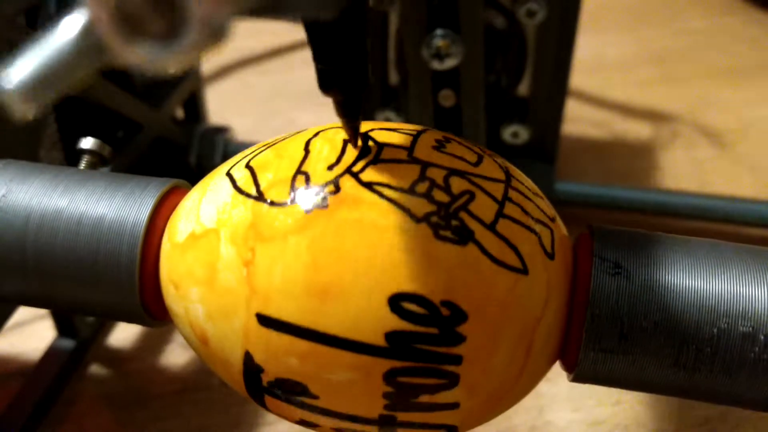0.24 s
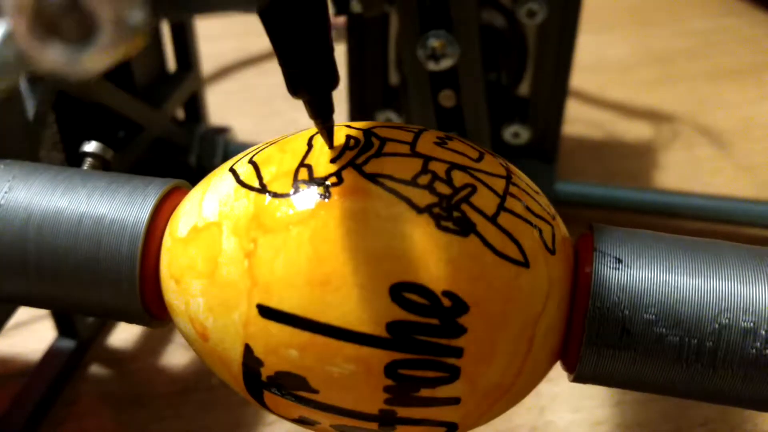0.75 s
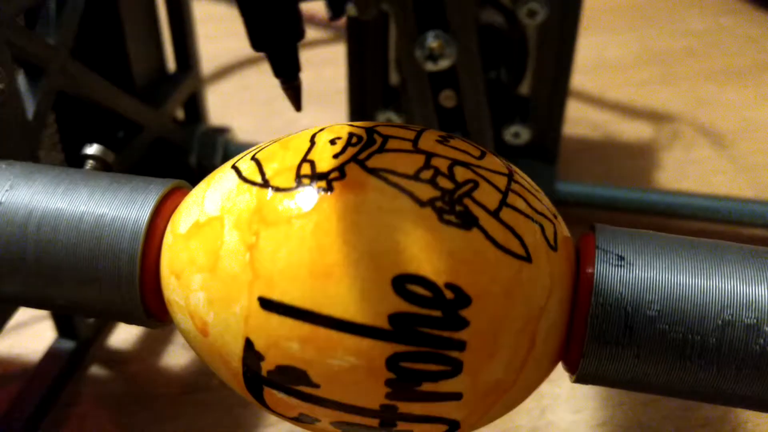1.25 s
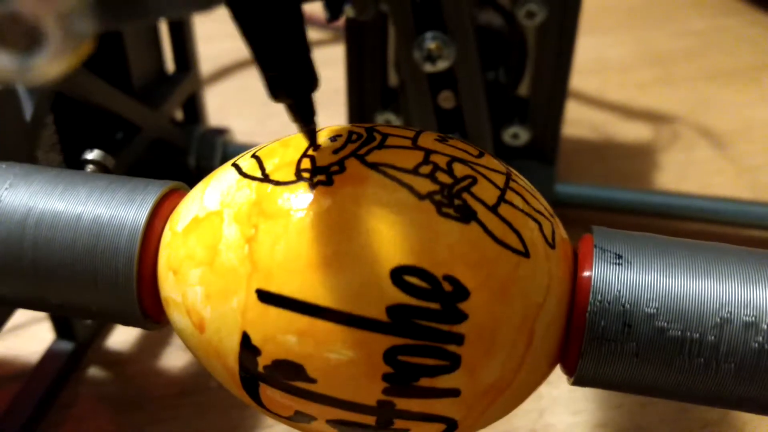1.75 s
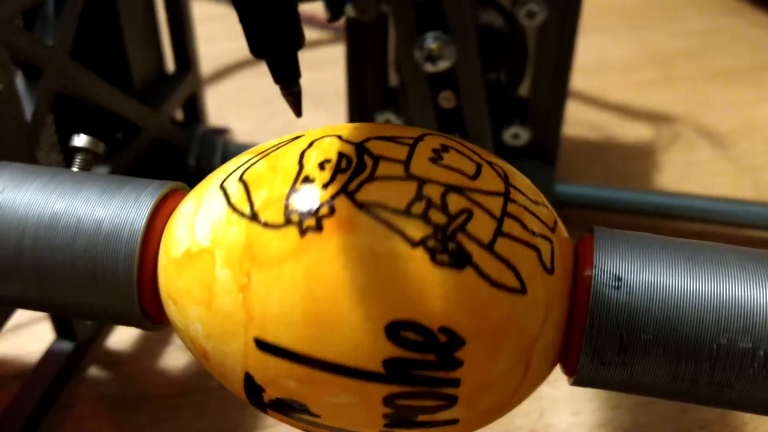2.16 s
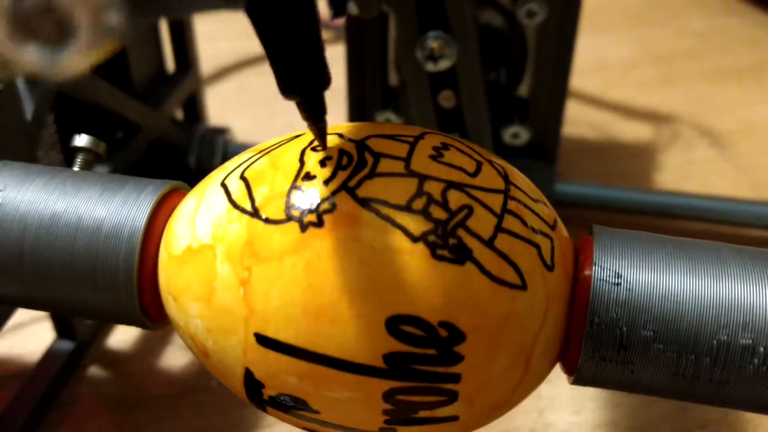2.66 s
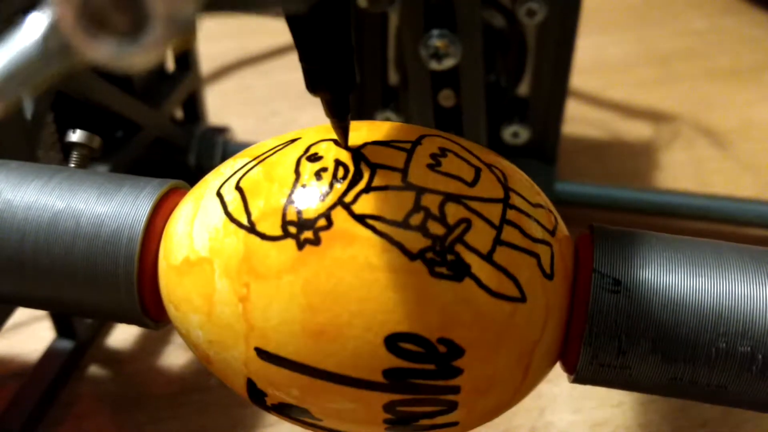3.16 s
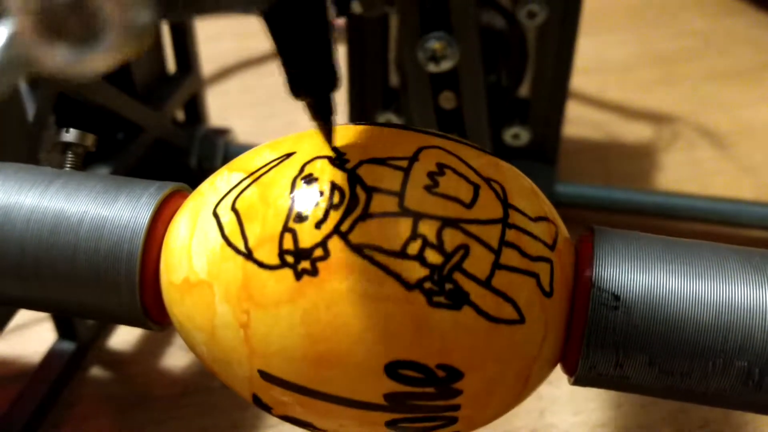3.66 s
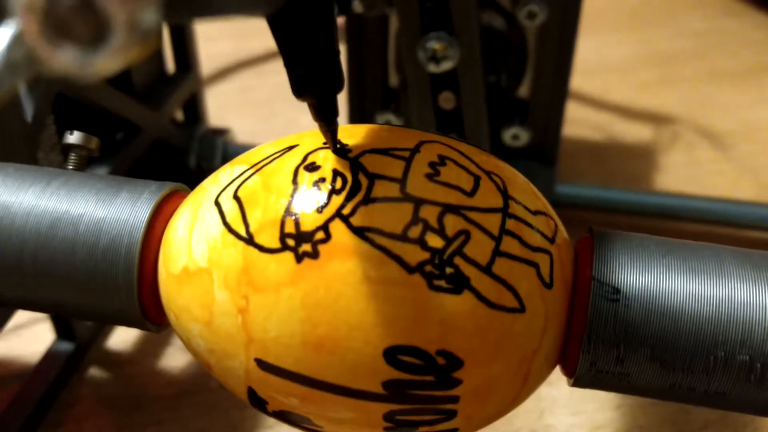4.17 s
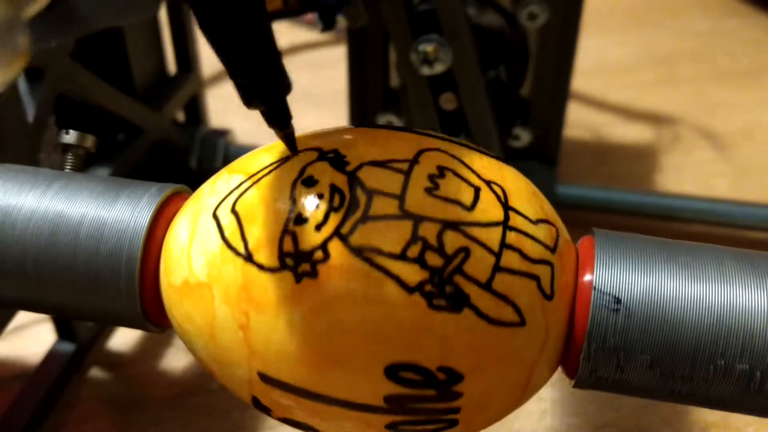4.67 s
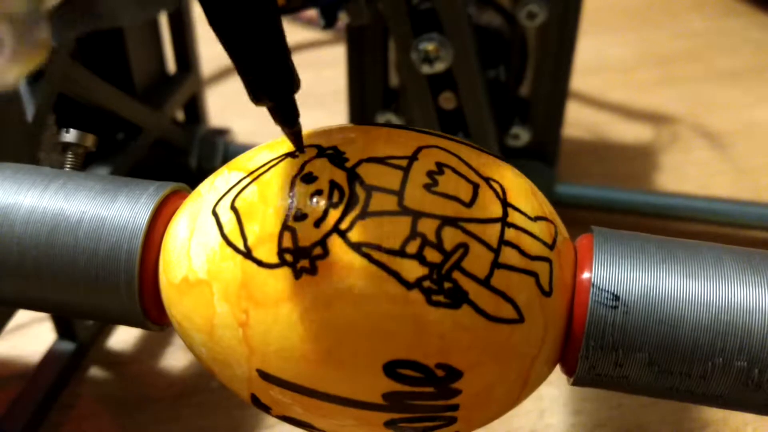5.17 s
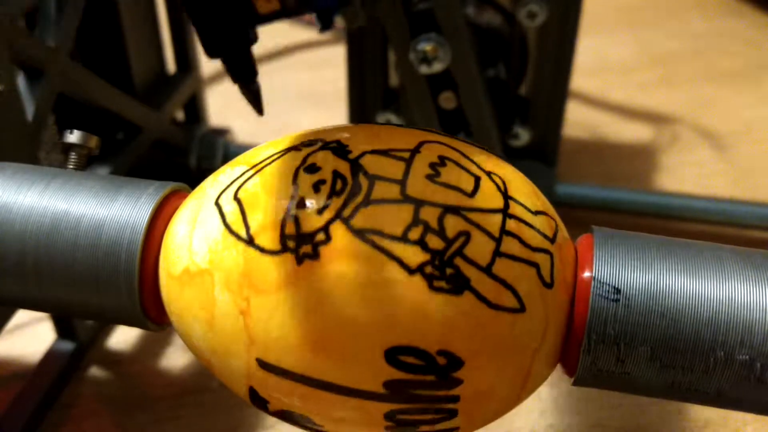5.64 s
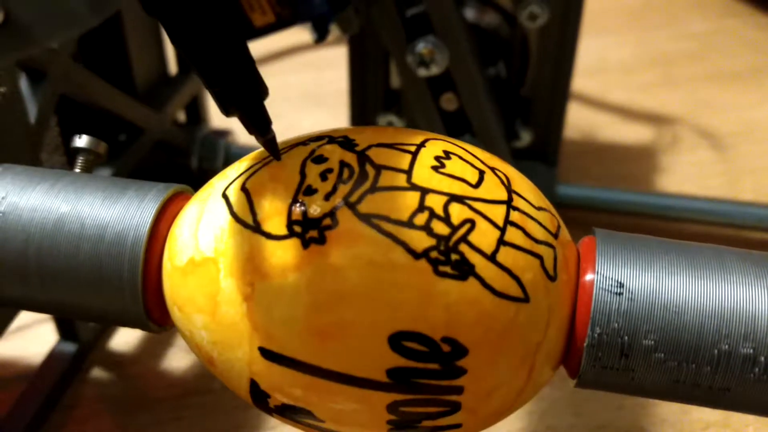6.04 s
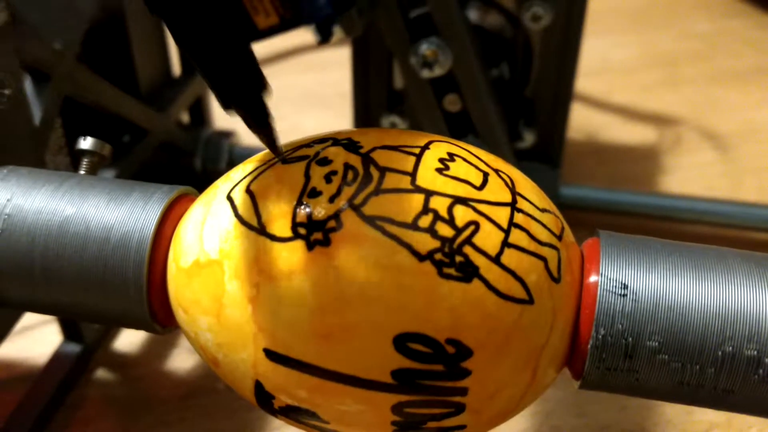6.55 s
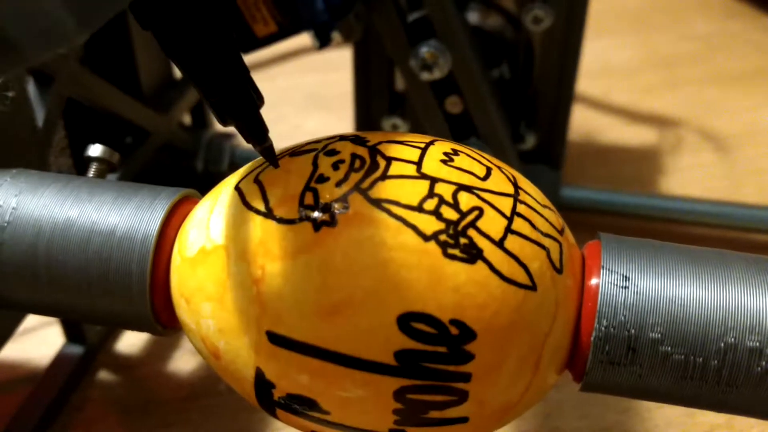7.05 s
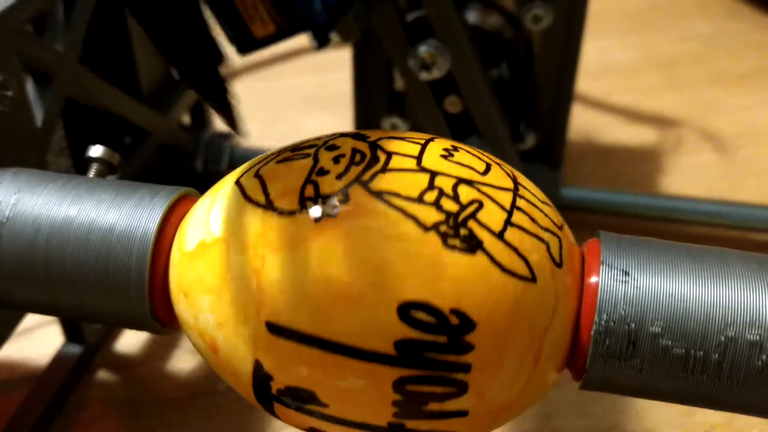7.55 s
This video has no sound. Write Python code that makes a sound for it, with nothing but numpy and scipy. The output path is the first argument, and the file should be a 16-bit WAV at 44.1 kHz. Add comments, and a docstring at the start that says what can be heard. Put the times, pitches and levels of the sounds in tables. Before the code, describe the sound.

A small plotter draws on an egg, heard close up on a wooden table in a quiet room. Its motors make a faint, high whine that throbs over a soft rumble and hiss as they move, and holds steady when they pause. A short, bright gear rasp lifts the pen; another lowers it into a hollow, rattling knock that leaves the table humming. This cycle repeats nine times, with tiny ticks and soft bumps between.

```python
"""Indoors, on a wooden table in a small quiet room, a little plotter draws on an egg.
Two stepper motors turn the egg and swing the pen arm: their coils whine and hiss, throbbing over a
rumble on the move, holding steady at rest. A geared servo rasps to lift and lower the pen and twitches
while it holds; the arm jolts at sharp corners. The pen lands on the shell with a hollow, rattling
knock that sets the table humming. The cycle is draw, lift, travel, drop, nine times over."""
import sys
import numpy as np
from scipy import signal
from scipy.fft import rfft, irfft, next_fast_len
from scipy.io import wavfile
from scipy.ndimage import uniform_filter1d

SR = 44100
rng = np.random.default_rng(int(sys.argv[2]) if len(sys.argv) > 2 else 0)


def master_out(mix):
    """Clip the mix to full scale and print it as 16-bit PCM to the path in sys.argv[1]."""
    frames = np.transpose(np.atleast_2d(mix))
    ceiling = np.clip(frames, -1, 1)
    pcm = np.round(ceiling * 32767).astype(np.int16)
    wavfile.write(sys.argv[1], SR, pcm)


N = 344421
TIME = np.arange(N) / SR

# Table levels are relative; each layer sets its own gain on top.
# low bed of the room: freq_hz, level_db
ROOM_TONE_EQ = [(25, -33), (60, -56), (125, 2), (260, 7), (400, -3.5), (600, -3), (1000, -9), (2000, -17),
                (4000, -35), (12000, -24.5), (15500, -23.5)]
# faint steady tones, from the electronics and, near 4.65 kHz, the whine's third harmonic: pitch_hz, level_db
FAINT_TONES = [(797, -70.5), (4037, -81), (4655, -79)]
# pen-down moves, one before each lift: coil_rate_hz, vigour_db, held_whine_db
DRAW_MOVES = [(32.95, 7, -53.5), (30.6, -7.5, -55.5), (19.3, 4.5, -50), (16.9, 4, -49), (17.07, -3, -52),
              (21.82, -1.5, -58), (23.4, -9, -63), (26.2, 2, -50), (30.8, 4.5, -52)]
# pen-up moves, one after each lift: coil_rate_hz, vigour_db, held_whine_db
TRAVEL_MOVES = [(18.3, -5, -49.5), (31.6, -0.5, -48.5), (53.8, -0.5, -46.5), (27.23, 0.5, -59),
                (49.5, -1, -62), (12.2, -9.5, -58), (36.9, -1.5, -51.5), (41.2, 1, -50), (45.9, -4, -49.5)]
# body of the running steppers: freq_hz, level_db
RUMBLE_EQ = [(40, -69), (90, -18), (170, 0.5), (240, 5), (320, -4.5), (560, -8), (780, -4), (1000, -14),
             (2000, -13), (4000, -49), (12000, -33)]
# hiss of their coils: freq_hz, level_db
HISS_EQ = [(1000, -11.5), (2800, -2), (4300, -1), (5500, -5), (8000, -5.5), (10000, -10.5), (15500, -42)]
# pen lifts: start_s, servo_start_db, servo_end_db
PEN_LIFTS = [(0.3712, -34, -35), (1.049, -42, -35), (1.847, -34.5, -34), (2.7496, -35.5, -33),
             (3.746, -39.5, -31), (4.7715, -36, -35), (5.445, -43.5, -32.5), (6.452, -35.5, -31.5),
             (7.3935, -33.5, -35.5)]
# pen drops: landing_s, servo_before_db, servo_after_db, knock_db
PEN_DROPS = [(0.705, -44.5, -43.5, -31), (1.4477, -43, -35.5, -28), (2.3305, -43, -37.5, -29),
             (3.1673, -43, -43.5, -30), (4.1033, -45, -40, -30.5), (5.095, -48.5, -43.5, -32),
             (5.91, -42.5, -39, -29.5), (6.8314, -41.5, -37, -28.5), (7.77, -43, -36.5, -30)]
# gear rasp going up: freq_hz, level_db
LIFT_EQ = [(300, -23), (1000, -12), (2000, -8.5), (3300, -11.5), (4400, 0.5), (5200, -6), (7200, 2),
           (8600, 5), (10200, -5.5), (11600, 1.5), (12200, -2), (12900, 0.5), (15500, -11)]
# gear rasp going down: freq_hz, level_db
DROP_EQ = [(300, -33), (1200, -5.5), (2500, -10), (3200, -11.5), (4400, -0.5), (5300, -7.5), (6600, -3),
           (8400, 1.5), (9800, -6.5), (11800, -7.5), (13000, -10), (15500, -14)]
# modes of the servo's case and gears: pitch_hz, level_db, t60_s
GEARBOX_MODES = [(1305, -6, 0.056), (2850, -52, 0.072), (4445, -13.5, 0.065), (5980, -15.5, 0.025),
                 (6150, -16.5, 0.044), (6950, -4, 0.0073), (8004, -21, 0.16), (7990, -19, 0.1),
                 (13000, -24, 0.023)]
# arm jolts at sharp corners of the line: start_s, level_db
ARM_JOLTS = [(0.52, -43.5), (1.733, -50), (3.48, -42), (4.598, -43), (4.739, -48), (6.254, -43.5),
             (6.388, -36), (7.154, -39.5), (7.348, -37)]
# modes of egg, arm and frame: pitch_hz, level_db, t60_s
FRAME_MODES = [(170.2, -7, 0.11), (222.4, -4, 0.076), (291.5, -11, 0.035), (357, -4, 0.027),
               (421, -2.5, 0.037), (606, 0.5, 0.048), (591, -8.5, 0.033), (849, -24.5, 0.097),
               (980, -10, 0.0084), (1174, -22.5, 0.15), (1376, -23.5, 0.068)]
# twitches of the holding servo: start_s, level_db
SERVO_TWITCHES = [(0.5332, -41), (0.5619, -33.5), (2.7131, -35), (3.479, -41), (3.5072, -32), (3.519, -39),
                  (3.551, -39.5), (4.4383, -45), (5.4016, -41), (5.4293, -33.5), (5.655, -39),
                  (6.3667, -36), (6.75, -41)]
# bright tick of a twitch: freq_hz, level_db
TWITCH_EQ = [(100, -26), (500, -6), (3000, -14), (4600, 5), (5700, -3), (7000, 7.5), (9000, -12),
             (12500, 0.5), (15500, -8)]
# contacts of one landing, as the tip touches and the arm rattles to rest: offset_s, thump_db, click_db
LANDING_CONTACTS = [(-.0018, -0.5, -0.5), (.002, -2.4, -8), (.0046, 4, 2.5), (.0077, -1.7, -2),
                    (0.0132, -4.5, -1)]
# click of the linkage: freq_hz, level_db
CLICK_EQ = [(60, -38), (300, -13), (1300, 9.5), (1900, 6.5), (3200, -1.5), (4600, 5), (7000, 4),
            (10000, -4.5), (11800, 0), (13500, -16), (15500, 1)]
# reverb decay by band: freq_hz, t60_s
ROOM_DECAY = [(100, 0.57), (500, 0.39), (2000, 0.18), (7000, 0.35), (14000, 0.063)]
# how far the left microphone port trails the right: freq_hz, lag_rad
LEFT_LAG = [(0, 0), (130, .7), (1000, .6), (1480, 2.6), (1620, 2.65), (1780, 3.2), (8880, 28.3),
            (11500, 37.2), (12400, 37.4), (13500, 35.6)]


def from_db(db):
    """Decibels to gain."""
    return 10 ** (np.asarray(db) / 20)


def at_hz(points, hz):
    """Read a curve on a log-frequency axis."""
    freqs, values = np.transpose(points)
    return np.interp(np.log(np.maximum(hz, 1)), np.log(freqs), values)


def drift(rate_hz):
    """Random modulator with a spread of 1, gliding to rate_hz new values a second."""
    knots = rng.standard_normal(8192)
    return np.interp(TIME * rate_hz, np.arange(len(knots)), knots) * np.sqrt(3 / 2)


def eq(x, curve):
    """Minimum-phase EQ: no pre-ring, and white noise keeps its power."""
    size = 8192
    gain = from_db(at_hz(curve, np.fft.rfftfreq(size, 1 / SR)))
    cepstrum = irfft(np.log(gain / np.sqrt(np.mean(gain ** 2))))
    cepstrum[1:size // 2] *= 2
    cepstrum[size // 2 + 1:] = 0
    return signal.oaconvolve(x, irfft(np.exp(rfft(cepstrum))))[:N]


def butter(x, kind, hz, order):
    """Plain low-pass or high-pass."""
    return signal.sosfilt(signal.butter(order, hz, kind, fs=SR, output="sos"), x)


def impulses(times_s, levels_db):
    """One single-sample click for each event."""
    out = np.zeros(N)
    samples = np.round(times_s * SR).astype(int)
    np.add.at(out, np.clip(samples, 0, N - 1), from_db(levels_db))
    return out


def ring(drive, hz, t60_s):
    """One resonance: a unit click starts a decaying sine of height 1."""
    decay, angle = from_db(-60 / (t60_s * SR)), 2 * np.pi * hz / SR
    return signal.lfilter([0, np.sin(angle)], [1, -2 * decay * np.cos(angle), decay ** 2], drive + 1e-18)


def crackle(clicks, rise_s):
    """Each click becomes a tiny noise burst that peaks after rise_s and dies away."""
    age = np.arange(SR // 20) / SR / rise_s
    envelope = signal.oaconvolve(clicks, age * np.exp(1 - age))[:N]
    return envelope * rng.standard_normal(N)


def stereo_ports(x):
    """Mono to stereo: sound reaches the left port later than the right."""
    size = next_fast_len(N + SR // 10)
    lag = np.interp(np.fft.rfftfreq(size, 1 / SR), *np.transpose(LEFT_LAG))
    left = irfft(rfft(x, size) * np.exp(-1j * lag), size)[:N]
    return np.array([left, x])


def room_tone():
    """A soft, low bed of noise, partly shared by the two sides."""
    left, right, shared = [eq(rng.standard_normal(N), ROOM_TONE_EQ) for _ in range(3)]
    return from_db(-63) * np.array([left, right]) + from_db(-60) * stereo_ports(shared)


def faint_tones():
    """Faint tones, steady in pitch and wavering a little in level."""
    return sum(np.sqrt(2) * from_db(db + 2 * drift(17)) * np.sin(2 * np.pi * hz * TIME)
               for hz, db in FAINT_TONES)


def stepper_controls(before_lift_s, after_lift_s, before_landing_s, after_landing_s):
    """Control curves for the steppers, which move between servo strokes and wait around each one."""
    moves, ready = [], 0
    for (lift, *_), (landing, *_), draw, travel in zip(PEN_LIFTS, PEN_DROPS, DRAW_MOVES, TRAVEL_MOVES):
        moves.append((ready, lift - before_lift_s, *draw))
        moves.append((lift + after_lift_s, landing - before_landing_s, *travel))
        ready = landing + after_landing_s
    rate_hz, motion, current, vigour_db = np.zeros((4, N))
    for start, end, move_hz, move_db, held_db in moves:
        during = (TIME >= start) & (TIME < end)
        rate_hz[during], motion[during], vigour_db[during] = move_hz, from_db(move_db), move_db
        current[during] = from_db(-53 + 0.5 * move_db)
        current[TIME >= end] = from_db(held_db - 2.5)  # holding current where the rotors stop
    return uniform_filter1d([rate_hz, motion, current, vigour_db], size=700)  # 16 ms ramps


def stepper_whine(rate_hz, current, pitch_hz, throb_per_hz):
    """Coil currents swell and reverse as the rotors turn: the whine throbs in motion, steady at rest."""
    egg_phase = 2 * np.pi * np.cumsum(rate_hz * (1 + 0.48 * drift(12))) / SR
    arm_phase = 2 * np.pi * np.cumsum(rate_hz * (0.22 + 0.303 * drift(11))) / SR
    depth = throb_per_hz * rate_hz * from_db(10 * drift(40))  # uneven steps make the throb stutter
    throb = (1 + depth * (np.cos(egg_phase) + 0.5j * np.cos(arm_phase))) / np.sqrt(1 + depth ** 2 / 2)
    waver = np.exp(1j * 0.023 * rate_hz * drift(70))  # the pitch wavers while the rotors turn
    carrier = np.exp(2j * np.pi * pitch_hz * TIME)
    return np.sqrt(2) * current * np.real(throb * waver * carrier)


def stepper_noise(motion, vigour_db, rumble_db, hiss_db):
    """Turning motors add a lumpy rumble; the coils hiss throughout. Both follow a move's vigour."""
    lumpy = rng.standard_normal(N) * motion * from_db(rumble_db + 2.5 * drift(90))
    hiss = eq(rng.standard_normal(N), HISS_EQ) * from_db(hiss_db + 0.39 * vigour_db)
    return eq(lumpy, RUMBLE_EQ) + hiss


def stepper_whistle(motion, pitch_hz, level_db):
    """A thin, flickering motor resonance, heard only in motion."""
    return motion * from_db(level_db) * drift(42) * np.sin(2 * np.pi * pitch_hz * TIME)


def servo_effort(strokes, lead_s, stop_s, load_shift_s, coast_db_per_s):
    """Servo envelope: it kicks in lead_s before each cue, runs to stop_s after it, then coasts down."""
    attack_s, kick_db = 0.013, 7
    effort = np.zeros(N)
    for cue_s, first_db, last_db, *_ in strokes:
        near = (TIME > cue_s - lead_s) & (TIME < cue_s + 0.5)
        age = TIME[near] - cue_s
        attack = np.minimum((age + lead_s) / attack_s, 1)
        load_db = np.interp(age, [0, load_shift_s], [first_db, last_db])
        coast_db = coast_db_per_s * np.maximum(age - stop_s, 0)
        effort[near] += attack * from_db(load_db + kick_db * (1 - attack) - coast_db)
    return effort


def servo_rasp(effort, colour, teeth_per_s, flutter_db, level_db, ring_db):
    """Gear teeth tick densely and unevenly, as loud as the motor works."""
    chance = teeth_per_s / SR
    teeth = (rng.random(N) < chance) * rng.standard_normal(N) / np.sqrt(chance)
    grit = (teeth + rng.standard_normal(N)) / np.sqrt(2)
    rasp = eq(grit * effort * from_db(level_db + flutter_db * drift(260)), colour)
    return rasp + from_db(ring_db) * gearbox_ring(rasp, spread_db=8)


def gearbox_ring(rasp, spread_db):
    """The rasp rings the servo's case; which mode sings loudest shifts as the gears turn."""
    out = 0
    for hz, db, t60_s in GEARBOX_MODES:
        unit_power = np.sqrt(4 * np.log(1000) / (t60_s * SR))
        out += unit_power * ring(rasp * from_db(db + spread_db * drift(45)), hz, t60_s)
    return out


def frame_ring(blows, spread_db, low_cut_hz):
    """Blows ring egg, arm and frame together; so small a body radiates little bass."""
    out = 0
    for k, (hz, db, t60_s) in enumerate(FRAME_MODES):
        polarity = (-1) ** ((k + 1) // 3)
        out += polarity * ring(blows * from_db(db + spread_db * drift(60)), hz, t60_s)
    return butter(out, "high", low_cut_hz, order=3)


def arm_jolts():
    """At sharp corners of the line the arm gives the frame a soft bump."""
    pushes = butter(impulses(*np.transpose(ARM_JOLTS)) + 1e-18, "low", hz=750, order=2)
    return frame_ring(pushes, spread_db=4.5, low_cut_hz=656)


def servo_twitches():
    """The holding servo twitches by a single tooth: a short, bright tick."""
    ticks = crackle(impulses(*np.transpose(SERVO_TWITCHES)), rise_s=0.001)
    return eq(ticks, TWITCH_EQ)


def pen_landings(thump_db, click_db, jitter_s):
    """The pen meets the shell in a quick run of contacts; each thumps the frame and clicks the linkage."""
    landing_s, _, _, knock_db = np.transpose(PEN_DROPS)[:, :, None]  # one row a landing
    offset_s, thumps_db, clicks_db = np.transpose(LANDING_CONTACTS)
    times_s = landing_s + offset_s
    # the servo repeats itself closely, so landings differ little in timing and colour
    times_s += jitter_s * rng.standard_normal(times_s.shape)
    blows = impulses(times_s, knock_db + thumps_db + thump_db)
    thump = frame_ring(blows, spread_db=0.8, low_cut_hz=126)
    click = crackle(impulses(times_s, knock_db + clicks_db + click_db), rise_s=0.0019)
    return thump + eq(click, CLICK_EQ)


def table_hum(pitch_hz, t60_s, level_db):
    """The wooden table takes each landing as one push and rings on, low and hollow."""
    landing_s, _, _, knock_db = np.transpose(PEN_DROPS)
    hum = ring(impulses(landing_s, knock_db + level_db), pitch_hz, t60_s)
    return butter(hum, "high", hz=75, order=2)


def room_reverb(send, build_s, width_db):
    """Diffuse reflections, partly alike on the two sides; the top end dies first."""
    age = np.arange(SR // 2) / SR
    hz = np.fft.rfftfreq(len(age), 1 / SR)
    white = rfft(rng.standard_normal((3, len(age))))
    tail = 0
    for centre_hz, t60_s in ROOM_DECAY:
        band = at_hz([(f, f == centre_hz) for f, _ in ROOM_DECAY], hz)
        tail += irfft(white * band, len(age)) * from_db(-60 * age / t60_s)
    tail *= np.minimum(age / build_s, 1) ** 2
    tail /= np.linalg.norm(tail[0])
    shared, left, right = signal.oaconvolve(send[None], tail, axes=1)[:, :N]
    return stereo_ports(shared) + from_db(width_db) * np.array([left, right])


def scene():
    """The plotter up close; its noises and knocks feed the reverb, its tones and the table stay dry."""
    rate_hz, motion, current, vigour_db = stepper_controls(
        before_lift_s=0.0082, after_lift_s=0.12, before_landing_s=0.1, after_landing_s=0.22)
    whine = stepper_whine(rate_hz, current, pitch_hz=1551, throb_per_hz=0.14)
    running = stepper_noise(motion, vigour_db, rumble_db=-58, hiss_db=-64)
    tones = whine + stepper_whistle(motion, pitch_hz=4290, level_db=-76) + faint_tones()
    lifting = servo_effort(PEN_LIFTS, lead_s=0.0074, stop_s=0.075, load_shift_s=0.072, coast_db_per_s=437)
    lowering = servo_effort(PEN_DROPS, lead_s=0.0919, stop_s=0.084, load_shift_s=0.0087,
                            coast_db_per_s=328)
    lifts = servo_rasp(lifting, LIFT_EQ, teeth_per_s=3000, flutter_db=1.05, level_db=-2.5, ring_db=-14)
    drops = servo_rasp(lowering, DROP_EQ, teeth_per_s=3500, flutter_db=1.5, level_db=-5, ring_db=-17)
    motors = running + lifts + drops
    landings = pen_landings(thump_db=-2, click_db=-5, jitter_s=0.00005)
    knocks = landings + from_db(3) * arm_jolts() + from_db(-6) * servo_twitches()
    hum = table_hum(pitch_hz=128.5, t60_s=0.95, level_db=-18)
    reverb = room_reverb(from_db(-14.5) * motors + from_db(-11) * knocks, build_s=0.0041, width_db=-2)
    return stereo_ports(tones + motors + knocks + hum) + reverb + room_tone()


def record(dry):
    """A steep high cut at 15.7 kHz takes the air off the mix."""
    return signal.sosfilt(signal.ellip(10, 0.2, 80, 15700, fs=SR, output="sos"), dry)


dry = scene()
out = record(dry)
master_out(out)
```